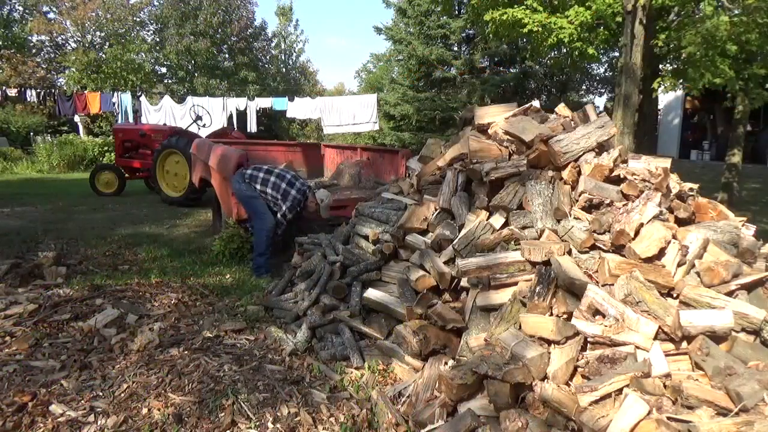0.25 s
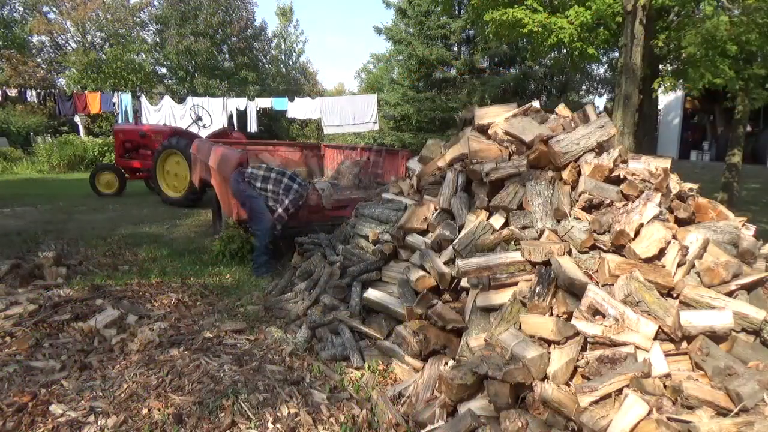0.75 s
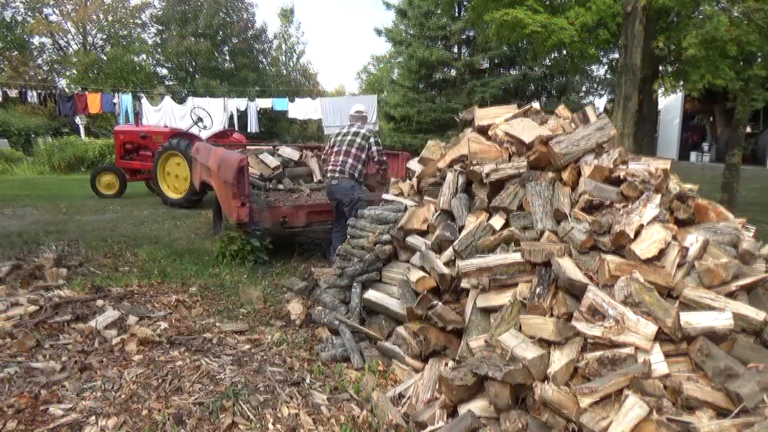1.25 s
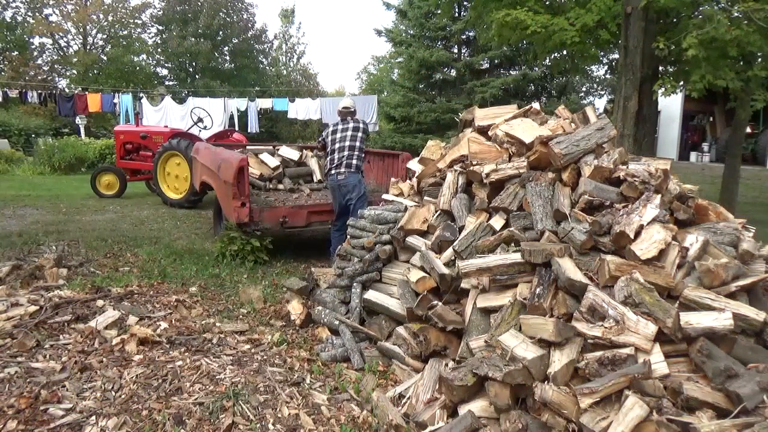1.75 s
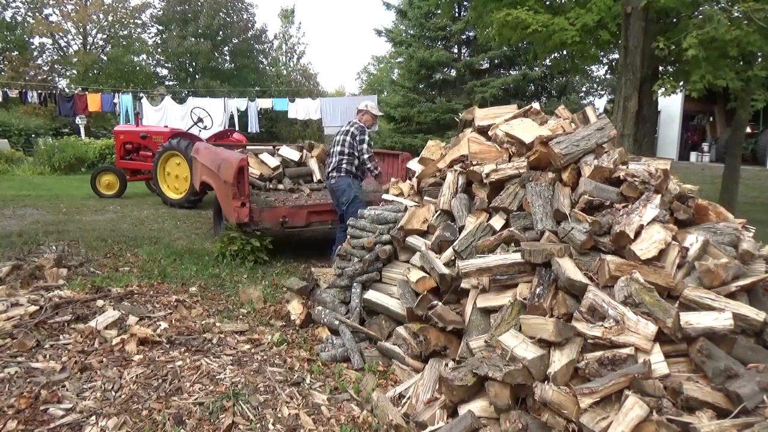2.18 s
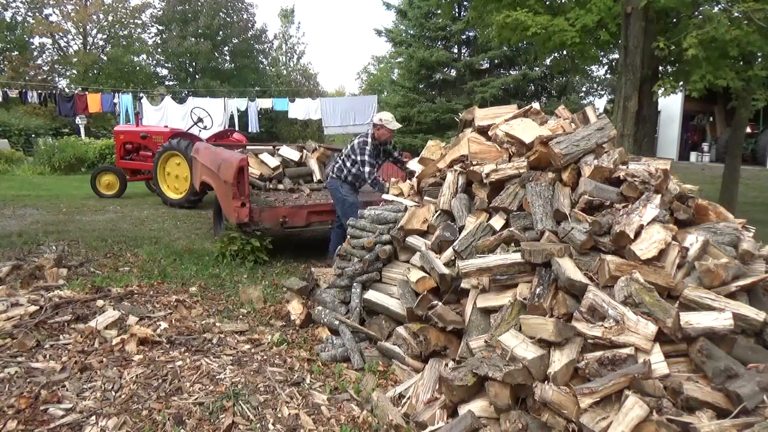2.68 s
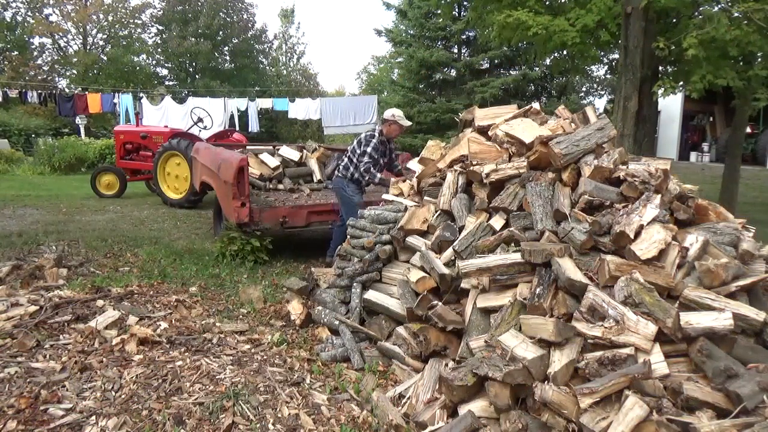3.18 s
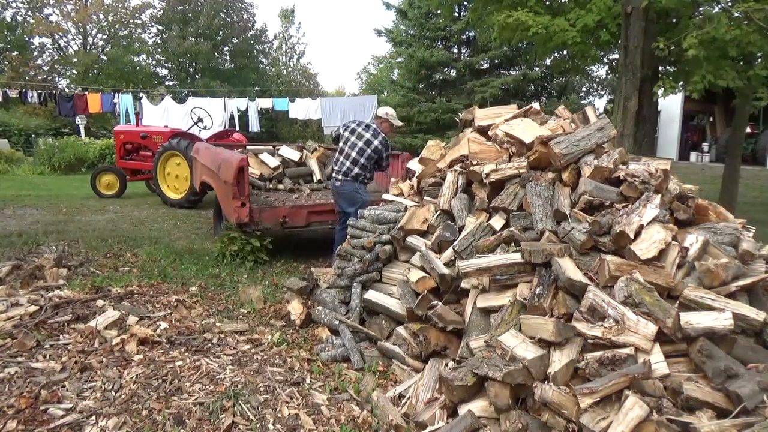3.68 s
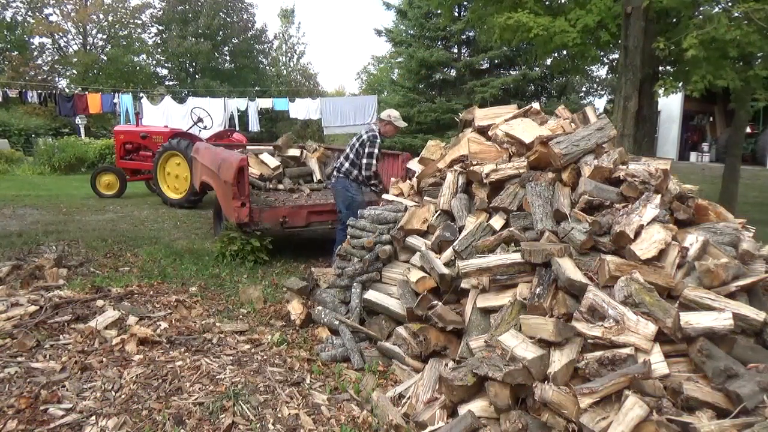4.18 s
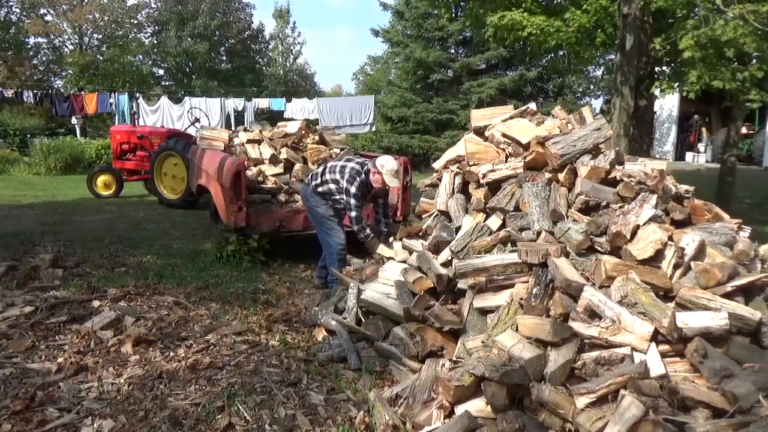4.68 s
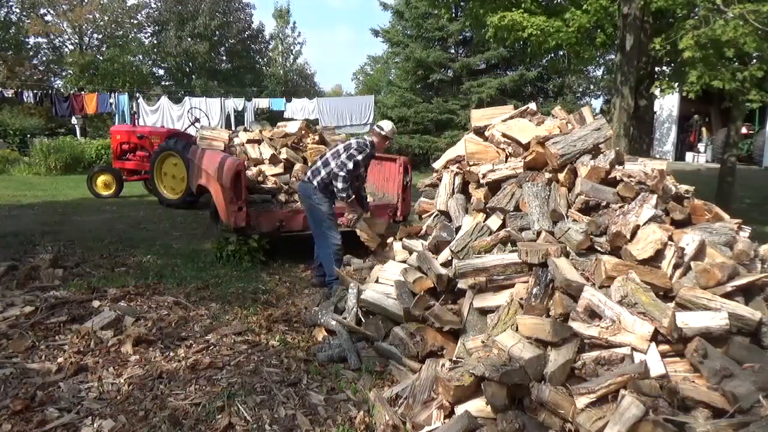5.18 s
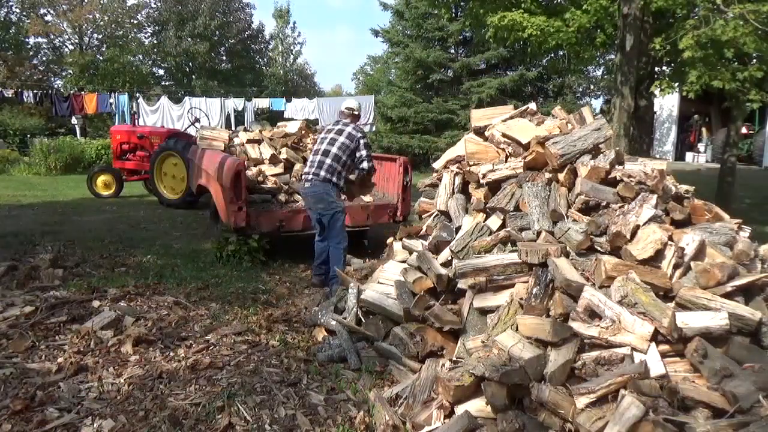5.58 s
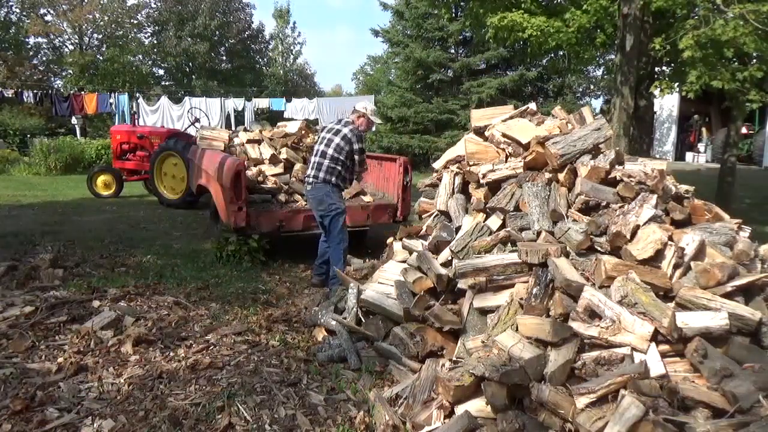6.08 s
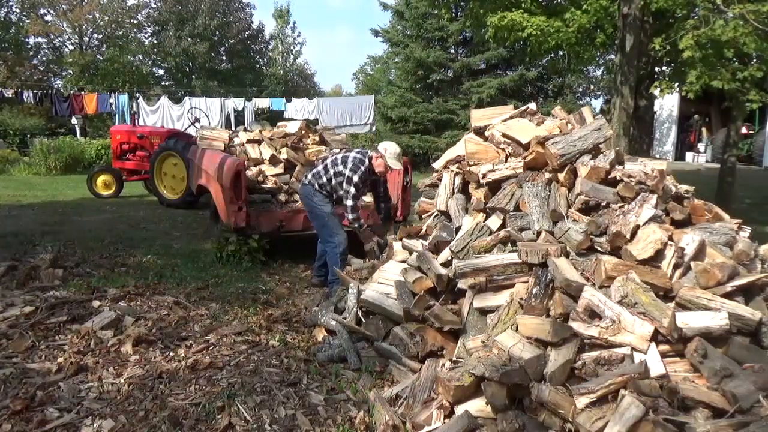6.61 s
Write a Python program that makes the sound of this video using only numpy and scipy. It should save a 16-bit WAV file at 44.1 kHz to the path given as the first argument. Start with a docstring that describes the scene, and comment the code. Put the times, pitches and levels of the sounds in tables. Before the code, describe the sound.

Chunks of wood clatter onto a metal trailer bed in four uneven volleys, small clacks and scrapes between, insects trilling high throughout.

```python
"""In a yard, split firewood is tossed onto a loaded steel trailer; trees and sheds send back a long soft echo.
Each landing is a shower of contacts: a knock in damped log modes, a thump with steel-bed modes, a bright crack.
Between throws, pieces clack, tick and scrape: short log tones, high ringing contacts, dense grains of noise.
Katydids trill close by in falling tones, over a noise chorus and two cricket bands.
Faint filtered noise is the still air, and louder filtered noise is the far road humming in the last seconds."""
import sys
import numpy as np
from scipy import signal
from scipy.fft import rfft, irfft, next_fast_len
from scipy.io import wavfile
from scipy.ndimage import uniform_filter1d

SR = 44100
rng = np.random.default_rng(int(sys.argv[2]) if len(sys.argv) > 2 else 0)


def generate_wav(signal):
    """Clip the signal to [-1, 1] and save it as 16-bit WAV at the path in sys.argv[1]."""
    frames = np.transpose(np.atleast_2d(signal))
    scaled = np.clip(frames, -1, 1) * 32767
    pcm = np.round(scaled).astype(np.int16)
    wavfile.write(sys.argv[1], SR, pcm)


N = 302085
TIME = np.arange(N) / SR  # s

# spectrum of a heavy thud, shape only: frequency_hz, level_db
THUD_SPECTRUM = [(60, -38), (125, -14), (190, -10.5), (280, -8), (380, -3), (520, 0.5), (680, -2),
                 (900, -10.5), (1300, -24)]
# spectrum of a splintered edge cracking, shape only: frequency_hz, level_db
CRACK_SPECTRUM = [(2500, -8), (4500, 2), (7000, 6), (9000, 6.5), (11000, -6.5)]
# how freely the steel bed resounds, damped by the growing load, freer again at the end: time_s, level_db
BED_RESOUND = [(0, 2.5), (2.6, 1), (4.1, 0), (5.5, -5.5), (6.1, -10), (6.85, -4)]
# bark dragged over bark: start_s, length_s, level_db
BARK_SCRAPES = [(0, 0.73, -46.5), (.77, 0.14, -46), (1.011, 0.078, -43), (1.508, 0.1, -47.5),
                (1.936, 0.0348, -28), (2.009, 0.089, -36.5), (2.315, 0.072, -40.5), (2.713, 0.058, -49),
                (3.71, .08, -53), (4.44, .1, -47.5), (4.759, 0.068, -38), (4.872, .18, -42.5),
                (5.091, 0.1207, -39.5), (5.31, 0.18, -46), (5.519, 0.088, -41), (6.315, 0.086, -47),
                (6.777, 0.0348, -39)]


def from_db(db):
    """Decibels to gain."""
    return 10 ** (np.asarray(db) / 20)


def rms_one(x):
    """Scale to unit power."""
    return x / np.sqrt(np.mean(x ** 2) + 1e-20)


def attack_one(x):
    """Scale so that the loudest 10 ms have unit power."""
    power = uniform_filter1d(x ** 2, size=SR // 100, mode="constant")
    return x / np.sqrt(power.max() + 1e-20)


def level(rows):
    """Gain over time from time_s, level_db rows."""
    return from_db(np.interp(TIME, *np.transpose(rows)))


def at_hz(points, hz):
    """Read a table on a log-frequency axis."""
    known_hz, values = np.transpose(points)
    return np.interp(np.log(hz + 1e-9), np.log(known_hz), values)


def fade(t, t60):
    """Exponential decay, 60 dB in t60 seconds."""
    return np.exp(-np.log(1000) * t / np.maximum(t60, 1e-3))


def add(track, s, sound):
    """Mix a sound into a track at time s."""
    start = int(np.clip(round(s * SR), 0, N - 1))
    track[start:start + len(sound)] += sound[:N - start]


def colour(x, spectrum):
    """Causal (minimum-phase) filter with the given spectrum, falling steeply beyond its ends."""
    size = 2 * next_fast_len(x.shape[-1] // 2 + 2048)
    hz = np.maximum(np.arange(size // 2 + 1) * SR / size, 1)
    octaves_out = np.abs(np.log2(hz / np.clip(hz, spectrum[0][0], spectrum[-1][0])))
    gain_db = at_hz(spectrum, hz) - 20 * np.minimum(octaves_out, 2)
    # folding the cepstrum onto positive time gives minimum phase
    cepstrum = irfft(np.log(from_db(gain_db)))
    cepstrum[1:size // 2] *= 2
    cepstrum[size // 2 + 1:] = 0
    return irfft(rfft(x, size) * np.exp(rfft(cepstrum)))[..., :x.shape[-1]]


def wide_noise(width, size=N):
    """White stereo noise; width is side over mid."""
    mid, side = rng.standard_normal((2, size))
    return mid + width * np.array([side, -side])


def pan(x, left_db):
    """Place a sound between the two microphones by its level difference."""
    return x * from_db([[left_db / 2], [-left_db / 2]])


def clatter(t, t60, grain_db):
    """Rough faces seat in a dying shower of tiny contacts."""
    contacts = rng.standard_normal(len(t))
    uneven = from_db(grain_db * rng.standard_normal(len(t)))
    return contacts * uneven * fade(t, t60)


def log_ring(t, hz, cycles):
    """A log rings in damped modes that each fall 60 dB in so many cycles."""
    strength = rng.uniform(0.19, 1, len(hz)) * rng.choice([-1, 1], len(hz)) * np.sqrt(hz / hz[0])
    return strength @ (np.sin(2 * np.pi * hz[:, None] * t) * fade(t, cycles / hz[:, None]))


def blow(t, length, shower_db):
    """A first touch, then a shower of contacts that swells as the faces meet and dies as they settle."""
    force = clatter(t, length, grain_db=2.0) * (1 - fade(t, 0.012))
    force *= from_db(shower_db) / np.linalg.norm(force)
    force[0] += 1
    return force


def knock_colour(hz):
    """The knock spectrum of a split log of the given pitch."""
    # shape only: multiple_of_pitch, level_db
    knock_shape = [(.15, -18), (.35, -5), (.6, -3), (1, 0), (1.4, -3), (2.2, -6), (3.5, -10.5), (6, -27)]
    return np.array(knock_shape) * [hz, 1]


def thud_share_db(hz, reference_db):
    """The lower a log rings, the heavier it is and the more it thuds, up to a limit."""
    fall_db_per_octave, heaviest_db = 13.5, -3.5
    share_db = reference_db - fall_db_per_octave * np.log2(hz / 1000)  # the reference is at 1000 Hz
    return min(share_db, heaviest_db)


def bed_ring(t, s):
    """The loaded steel bed rings in damped modes, freer or duller with the time s of the blow."""
    # modes of the loaded bed, relative levels: mode_hz, level_db, t60_s
    bed_modes = [(133.3, -18, 0.21), (186.4, -26.5, 1), (219, -12, 0.12), (289.2, -11, 0.13),
                 (336, -13, 0.19), (387, 2.5, 0.36), (425, -4, 0.31), (477, 27, 0.051), (523, -7, 0.23),
                 (534, -29, .1), (657.4, 13, 0.29), (780, 21, 0.033), (890, 23, 0.055)]
    hz, db, t60 = np.transpose(bed_modes)[:, :, None]
    strength = from_db(db + rng.normal(0, 1.4, db.shape)) * rng.choice([-1, 1], db.shape)
    ring = np.sum(strength * np.sin(2 * np.pi * hz * t) * fade(t, t60), axis=0)
    return from_db(np.interp(s, *np.transpose(BED_RESOUND)) - 11.5) * attack_one(ring)


def landings():
    """Each landing knocks a log of its own, thumps the bed and cracks at the splintered edge."""
    # thrown wood, levels ahead of the mix: start_s, knock_db, crack_re_knock_db, clatter_s, pitch_hz
    throws = [(0.0, -7.5, -7, 0.14, 1180), (0.025, -10, -5.5, 0.2, 1154), (0.069, -15.5, -7.5, 0.35, 1018),
              (0.35, -23.5, -6, 0.061, 564), (0.37, -11, -16, 0.102, 1890), (0.389, -13.5, -15, 0.22, 1390),
              (0.449, -15, -24, 0.14, 1280), (0.524, -22.5, -12, 0.033, 1470),
              (1.947, -12.5, 1, 0.025, 1590), (1.956, -15.5, 2, 0.0058, 1873),
              (1.992, -14, -11, 0.045, 2300), (2.023, -13.5, -3, 0.08, 706),
              (2.044, -15.5, -5.5, .15, 1162), (2.112, -16.5, -2, 0.111, 1596),
              (2.22, -25.5, -4, 0.024, 1380), (2.348, -26.5, -2.5, 0.046, 943),
              (4.183, -9, -25, 0.012, 2314), (4.189, -12.5, -15, 0.028, 2520), (4.2, -11, -12, 0.084, 2320),
              (4.212, -24, 3, 0.0325, 900), (6.152, -10.5, -9, 0.051, 1064), (6.158, -10, -15, 0.099, 2440),
              (6.184, -18, -3.5, 0.12, 950), (6.1981, -15, -8.5, 0.25, 890),
              (6.2622, -14.5, -12, 0.0156, 926), (6.273, -23, -4, 0.2, 1000)]
    knocks, thuds, cracks = np.zeros((3, N))
    t = np.arange(SR // 3) / SR
    for s, db, crack_db, length, hz in throws:
        modes_hz = hz * np.geomspace(.5, 3, 14) * np.exp(rng.normal(0, .06, 14))
        # split wood is heavily damped
        ring = attack_one(colour(log_ring(t, modes_hz, cycles=27.0), knock_colour(hz)))
        rough = attack_one(colour(blow(t, length, shower_db=12.0), knock_colour(hz)))
        add(knocks, s, from_db(db) * attack_one(rough + from_db(-6) * ring))

        bed = bed_ring(t, s)
        push = attack_one(colour(blow(t, length, shower_db=-0.5), THUD_SPECTRUM))
        thud_db = db + thud_share_db(hz, reference_db=-7.5)
        add(thuds, s, from_db(thud_db) * attack_one(push + bed))

        crack = colour(blow(t, 1.04 * length, shower_db=8.0), CRACK_SPECTRUM)
        add(cracks, s, from_db(db + crack_db) * attack_one(crack))
    knocks = pan(from_db(-11.5) * knocks, left_db=2.0)
    thuds = pan(from_db(-2.5) * thuds, left_db=1.0)
    cracks = pan(from_db(-10.5) * cracks, left_db=-.5)
    return knocks + thuds + cracks


def drag():
    """Each scrape takes hold quickly, keeps its strength while the piece slides, then dies away."""
    attack_s, release_s = 0.0074, 0.16
    out = np.zeros(N)
    for start, length, db in BARK_SCRAPES:
        t = np.arange(int((length + release_s) * SR)) / SR
        hold = np.minimum(t / attack_s, 1)
        release = fade(np.maximum(t - length, 0), release_s)
        add(out, start, from_db(db) * hold * release)
    return out


def scraping():
    """Bark catches and lets go in dense uneven grains."""
    # shape only: frequency_hz, level_db
    bark_spectrum = [(300, -8.5), (1200, -12), (3000, -3), (6000, 0.5), (10000, 5), (11500, -12.5)]
    catches = rng.random(N) < 2500 / SR  # 2500 grains per s on average
    grains = catches * rng.standard_normal(N) * from_db(4.7 * rng.standard_normal(N))
    return drag() * rms_one(colour(grains, bark_spectrum))


def bumps(count):
    """Each scrape sets off a few chance touches on its neighbours, as rows like those of the nudges."""
    knock_re_scrape_db, crack_db = 6, -9.5
    typical_hz, spread_octaves = 1933, 0.59
    rows = []
    for start, length, db in BARK_SCRAPES:
        for when, (strength, size) in zip(rng.random(count), rng.standard_normal((count, 2))):
            knock_db = db + knock_re_scrape_db + 2 * strength
            hz = typical_hz * 2 ** (spread_octaves * size)
            rows.append((start + when * length, knock_db, crack_db, hz))
    return rows


def nudges():
    """Pieces nudged, lifted or bumped: a short clack around the log's own pitch."""
    # light touches, levels ahead of the mix: start_s, knock_db, crack_re_knock_db, pitch_hz
    touches = [(0.882, -28.5, 15.5, 2620), (0.95, -29, -12, 1280), (1.164, -25.5, 17, 3190),
               (2.374, -26, -14.5, 1400), (2.454, -30, 7, 3444), (2.63, -28.5, -6, 1700),
               (2.707, -22, -7, 1350), (2.865, -32.5, 2, 1290), (3.077, -26.5, -17, 2630),
               (3.77, -36.5, -10, 2030), (4.494, -33, -6, 700), (4.581, -22.5, -7, 2830),
               (4.928, -22.5, -4, 1710), (4.973, -20.5, -11, 2400), (4.994, -14.5, -7, 2370),
               (5.013, -15.5, -11, 1130), (5.046, -22.5, -10, 2600), (5.14, -24, -8, 1500),
               (5.201, -23.5, 4, 3000), (5.212, -19, 1, 2760), (5.281, -23.5, 12, 3560),
               (5.333, -27, -5.5, 1047), (5.383, -32, 1, 800), (5.406, -19.5, -9, 1650),
               (6.463, -34, -6, 400), (6.594, -32.5, 4, 1980), (6.8, -19.5, 8.5, 590),
               (6.824, -26, -3, 600)]
    out, t = np.zeros(N), np.arange(SR // 6) / SR
    for s, db, crack_db, hz in touches + bumps(count=3):
        force = blow(t, length=0.045, shower_db=6.0)
        tone = log_ring(t, hz * np.array([1, 1.18, 1.5]), cycles=7.7)
        knock = attack_one(colour(force, knock_colour(hz))) + from_db(-8.0) * attack_one(tone)
        thud_db = thud_share_db(hz, reference_db=-11)
        thud = from_db(thud_db) * attack_one(colour(force, THUD_SPECTRUM))
        crack = from_db(crack_db - 9.5) * attack_one(colour(force, CRACK_SPECTRUM))
        add(out, s, from_db(db - 12.5) * (knock + thud + crack))
    return out


def katydid(trills, start_hz, end_hz, length, opening_db, lead):
    """Wings open with a short rasp, then close in a tone that falls as the stroke slows."""
    out, u = np.zeros(N), np.linspace(0, 1, int(length * SR))  # u runs through one closing stroke
    swell = np.abs(np.sin(np.pi * u ** 0.56)) ** 0.75
    opening_swell = swell[::2]  # the opening takes half as long
    for first, last, per_s, db in trills:
        for s in np.linspace(first, last, round((last - first) * per_s) + 1):
            hz = (start_hz + (end_hz - start_hz) * u ** 1.55) * (1 + rng.normal(0, 0.00468))
            slips = np.cumsum(rng.normal(0, 0.024, len(u)))  # uneven teeth blur the tone
            gain = from_db(db + rng.normal(0, 0.55))
            tone = np.sin(2 * np.pi * np.cumsum(hz) / SR + slips) * np.sqrt(2)
            add(out, s - length / 2, gain * swell * tone)
            rough_phase = np.cumsum(rng.normal(0, 0.13, len(u)))
            rasp = np.sin(2 * np.pi * .985 * start_hz * u * length + rough_phase)
            add(out, s - lead, gain * from_db(opening_db) * opening_swell * rasp[:len(opening_swell)])
    return out


def katydids():
    """Three katydids and two far ones, each chirp smeared by the foliage."""
    # trills of each singer: first_chirp_s, last_chirp_s, chirps_per_s, level_db
    near_trills = [(.128, .491, 14, -38.5), (.562, 1.917, 14.7, -31.5), (1.985, 2.2, 14, -38),
                   (2.268, 3.013, 14.7, -31.5), (3.174, 4.625, 14.5, -31.5), (4.73, 5.516, 14, -36),
                   (5.638, 5.845, 14.5, -35), (5.923, 6.785, 14, -34.5)]
    second_trills = [(.573, 1.525, 16.8, -33), (1.61, 1.875, 15, -32), (2.19, 2.605, 16.9, -34.5),
                     (2.685, 3.08, 15, -34.5), (3.13, 3.61, 16.7, -32), (3.7, 4.145, 15.7, -33),
                     (4.21, 4.69, 16.6, -32), (4.76, 5.315, 16.2, -33.5), (5.91, 6.825, 16.4, -34.5)]
    third_trills = [(.55, 1.57, 14.6, -34), (2.6, 3.28, 14.7, -36), (3.35, 4.62, 14.2, -38)]
    far_trills = [(.05, 6.8, 13.3, -47), (.09, 6.83, 15.7, -45.5)]
    near = katydid(near_trills, start_hz=7637, end_hz=6784, length=.016, opening_db=0.0, lead=0.017)
    second = katydid(second_trills, start_hz=8020, end_hz=7374, length=0.018, opening_db=-24.0, lead=0.034)
    third = katydid(third_trills, start_hz=7820, end_hz=7560, length=.021, opening_db=4.5, lead=0.022)
    far = katydid(far_trills, start_hz=8576, end_hz=8070, length=0.018, opening_db=5.5, lead=0.016)
    singers = pan(near, left_db=-3.5) + pan(second + far, left_db=-.8) + pan(third, left_db=0.7)
    t = np.arange(SR // 10) / SR
    leaves = rms_one(wide_noise(width=0.21, size=len(t)) * fade(t, 0.046)) / np.sqrt(len(t))
    smear = signal.fftconvolve(singers, leaves, axes=1)[:, :N]
    return singers + from_db(-6.5) * smear


def insect_chorus():
    """Many blurred singers make a band of noise; two narrower bands are far crickets."""
    # shape only: frequency_hz, level_db
    chorus_spectrum = [(2500, -39), (4000, -26), (5800, -35), (6500, -4.5), (7200, 3.5), (8000, 7.5),
                       (8700, 5.5), (9300, -5), (10000, -30), (11300, -34.5)]
    # strength of the chorus: time_s, level_db
    swarm = [(0, -36.5), (.5, -49), (.8, -34.5), (1.5, -38), (2.4, -41.5), (3.2, -41.5), (4.3, -38),
             (5.0, -39.5), (5.7, -41), (6.85, -41)]
    # far crickets: centre_hz, width_hz, level_db
    cricket_bands = [(3330, 94, -61), (4690, 500, -50.5)]
    chorus = level(swarm) * rms_one(colour(wide_noise(width=0.209), chorus_spectrum))
    for hz, width_hz, db in cricket_bands:
        peak = signal.iirpeak(hz, hz / width_hz, fs=SR)
        chorus += from_db(db) * rms_one(signal.lfilter(*peak, wide_noise(width=0.596)))
    return chorus


def still_air():
    """The steady faint noise of the open yard."""
    # shape only: frequency_hz, level_db
    air_spectrum = [(25, -23), (50, -14), (92, -5.5), (160, -12.5), (280, -8.5), (650, -5), (1120, -3),
                    (1900, -6.5), (3000, -9.5)]
    return from_db(-55.5) * rms_one(colour(wide_noise(width=0.55), air_spectrum))


def ticks():
    """Tiny hard contacts that ring very high."""
    # thin ticks, levels ahead of the echo: start_s, peak_db, pitch_hz, rattle_s
    contacts = [(0.361, -10.5, 8454, 0.0213), (0.367, -15, 8200, 0.015), (0.463, -15, 8300, 0.017),
                (0.5755, -14, 9340, 0.0065), (0.7933, -20.5, 8330, 0.0071), (0.838, -20, 8570, .02),
                (5.106, -19.5, 8800, 0.01), (5.12, -25, 8500, 0.0074), (5.204, -18, 8000, 0.0033),
                (5.212, -20, 5040, 0.0038), (5.282, -16, 4240, 0.0073)]
    out, t = np.zeros(N), np.arange(SR // 20) / SR
    for s, db, hz, length in contacts:
        ring = np.sin(2 * np.pi * hz * t) * fade(t, 0.48 * length)
        tick = signal.fftconvolve(blow(t, length, shower_db=2.0), ring)
        add(out, s, from_db(db) * tick / np.abs(tick).max())
    return out


def far_road():
    """A distant road hums: filtered noise that comes up after four seconds."""
    # shape only: frequency_hz, level_db
    road_spectrum = [(100, -43), (180, -19), (280, -15.5), (400, -14), (520, -7), (950, 0.5), (1400, -8.5),
                     (2160, -17), (3000, -21)]
    # strength of the road: time_s, level_db
    traffic = [(0, -79), (4.1, -71), (4.35, -47.5), (4.7, -45.5), (5.3, -45), (6.0, -43.5), (6.85, -44)]
    return level(traffic) * rms_one(colour(wide_noise(width=0.29), road_spectrum))


def yard(x):
    """The woodpile scatters the sound at once; the hollow trailer and the trees draw it out, lows longest."""
    # echo of the yard, by band: frequency_hz, t60_s
    yard_t60 = [(120, 1.47), (250, 1.05), (500, 0.86), (1500, 0.73), (4000, 0.66), (10000, 0.87)]
    # shape of the late echo: frequency_hz, level_db
    echo_spectrum = [(60, -1.0), (130, 3.5), (200, -0.5), (500, -1), (1500, -1), (4000, -2.5), (11000, -7.5)]
    t = np.arange(int(1.2 * SR)) / SR
    edges = np.geomspace(60, 14000, 9)  # Hz
    echo = 0
    for low, high in zip(edges, edges[1:]):
        band_filter = signal.butter(2, [low, high], "band", fs=SR, output="sos")
        band = signal.sosfilt(band_filter, wide_noise(width=0.25, size=len(t)))
        echo = echo + band * fade(t, at_hz(yard_t60, np.sqrt(low * high)))
    echo = colour(echo * (1 - fade(t, 0.064)), echo_spectrum)
    near = wide_noise(width=0.76, size=len(t)) * fade(t, 0.093) * (1 - fade(t, 0.046))
    # the long echo follows how freely the bed resounds
    late = signal.fftconvolve(x * level(BED_RESOUND), from_db(-8.0) * rms_one(echo), axes=1)
    early = signal.fftconvolve(x, from_db(-5.5) * rms_one(near), axes=1)
    return x + (late + early)[:, :N] / np.sqrt(len(t))


def scene():
    """Wood in the yard, insects, still air and the far road."""
    wood = landings() + pan(nudges() + scraping(), left_db=0.5) + pan(ticks(), left_db=0.0)
    # the wood carries no deep bass below about 70 Hz
    wood = signal.sosfilt(signal.butter(2, 70, "high", fs=SR, output="sos"), wood)
    return yard(wood) + katydids() + insect_chorus() + still_air() + far_road()


def record(dry):
    """The top is cut steeply."""
    cutoff_hz = 11250
    return signal.sosfilt(signal.ellip(14, .2, 80, cutoff_hz, fs=SR, output="sos"), dry)


dry = scene()
out = record(dry)
generate_wav(out)
```